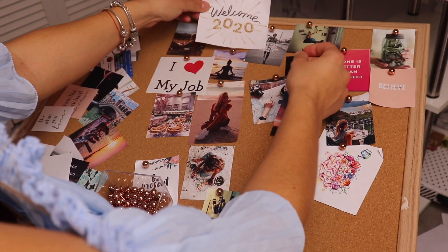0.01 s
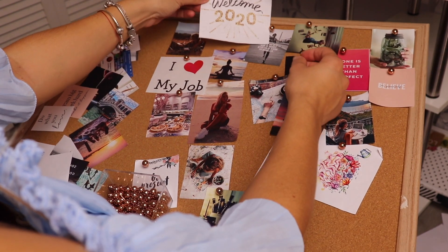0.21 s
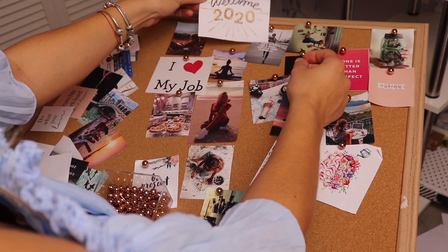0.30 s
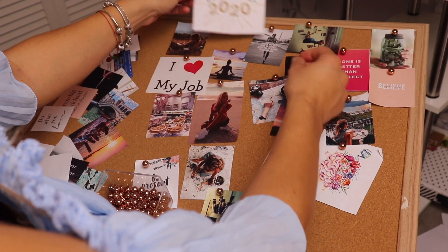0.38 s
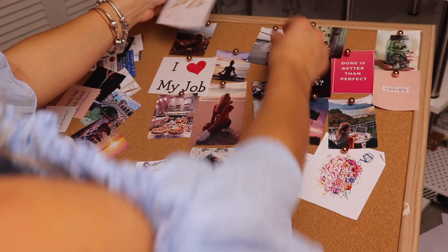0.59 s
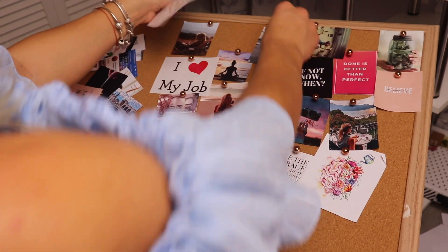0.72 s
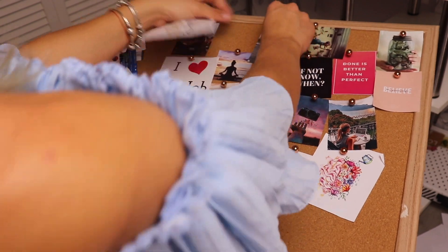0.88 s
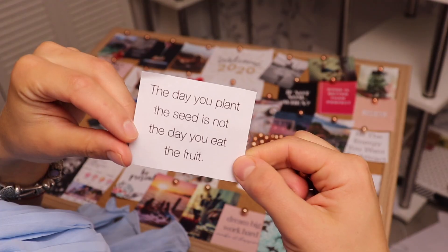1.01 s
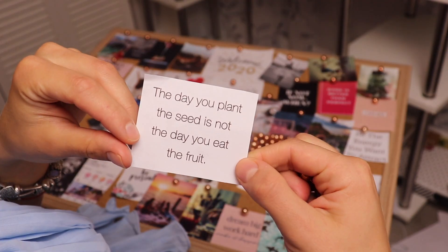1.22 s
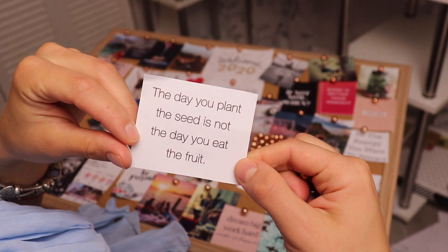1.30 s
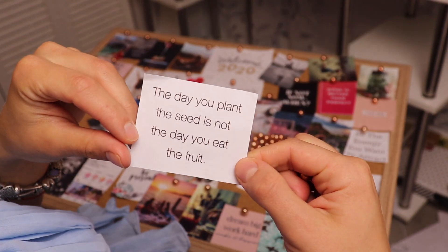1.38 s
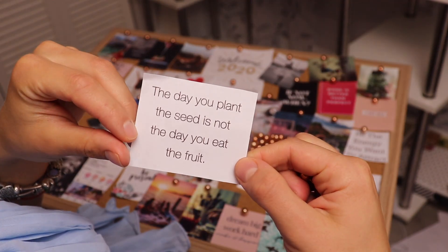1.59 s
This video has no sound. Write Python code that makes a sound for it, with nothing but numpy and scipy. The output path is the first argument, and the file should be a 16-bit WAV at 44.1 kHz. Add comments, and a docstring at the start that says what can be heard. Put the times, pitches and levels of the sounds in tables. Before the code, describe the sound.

Close up in a quiet small room, stiff paper brushes cork in uneven strokes, a pin snaps brightly, a softer click follows, then a crunchy knock and two soft taps before only low room air remains.

```python
"""Cards slide and rustle on a cork board in a small quiet room, made from dense random grains in four tone colours.
A pin snaps sharply and a lighter click follows: very short pushes set fading sine tones (modes) ringing.
A dull knock rattles and crunches on the board, then soft fingertips tap it; these are ringing modes too.
A faint sine hum wavers for the first second under a steady room tone of shaped noise.
The slides, snaps, knock and taps also sound through a room tail of fading noise."""
import sys
import numpy as np
from scipy import signal
from scipy.fft import rfft, irfft
from scipy.io import wavfile
from scipy.ndimage import uniform_filter1d

SR = 44100
rng = np.random.default_rng(int(sys.argv[2]) if len(sys.argv) > 2 else 0)


def volts_from_decibels(level):
    """Turn decibel levels (scalar or array-like) into linear amplitude factors."""
    exponent = np.asarray(level, float) / 20
    return 10 ** exponent


def output_pcm(signal):
    """Save a mono or channel-first signal as 16-bit PCM at the path in sys.argv[1].

    Samples are clipped to [-1, 1] before scaling.
    """
    pcm = np.clip(np.atleast_2d(signal).T, -1, 1) * 32767
    wavfile.write(sys.argv[1], SR, np.round(pcm).astype(np.int16))


N = 72765  # samples, 1.65 s


def across(table, size):
    """Reads a (frequency, value) table at every frequency of a transform, on a logarithmic scale."""
    hz, value = np.array(table, float).T
    bin_hz = np.maximum(np.fft.rfftfreq(size, 1 / SR), 1)
    return np.interp(np.log(bin_hz), np.log(hz), value)


def colour(x, table):
    """Gives a sound the tone colour in a (frequency, level) table and scales it to an rms of 1."""
    size = x.shape[-1]
    y = irfft(rfft(x) * volts_from_decibels(across(table, size)), size)
    return y / np.sqrt(np.mean(y ** 2))


def stereo_noise(size, like):
    """Noise whose left and right are as alike as a table says: 0 is unrelated, 1 is the same."""
    c = np.clip(across(like, size), 0, 1)
    mid, side = rfft(rng.standard_normal((2, size)))
    mid, side = np.sqrt(1 + c) * mid, np.sqrt(1 - c) * side
    return irfft(np.array([mid + side, mid - side]), size) / np.sqrt(2)


def walk(rate):
    """A random up-and-down curve with about `rate` new values per second, smoothed; its spread is near 1."""
    k = int(SR / rate)
    steps = np.repeat(rng.standard_normal(N // k + 1), k)
    return 1.3 * uniform_filter1d(uniform_filter1d(steps, k), k)[:N]


def room(dry):
    """Echoes merge into a diffuse tail: half-octave bands of noise, each dying at its own rate."""
    # time to fade by 60 dB: (frequency [Hz], time [s])
    fade_times = [(200, 0.57), (500, 0.3), (1400, 0.25), (3700, 0.32), (9000, 0.2), (15000, 0.0667)]
    # tone colour of the tail: (frequency [Hz], level [dB])
    tail_colour = [(200, 2), (500, -1.5), (1400, 2.5), (3700, -3), (7500, 1.5), (15000, 0.5)]
    # likeness of left and right: (frequency [Hz], likeness [0-1])
    tail_like = [(200, 0.54), (600, 0.88), (1500, 0.17), (4000, 0.12)]
    size, onset_s = 16384, .003
    t = np.arange(size) / SR
    bin_hz = np.maximum(np.fft.rfftfreq(size, 1 / SR), 1)
    noise = rfft(stereo_noise(size, tail_like)) * volts_from_decibels(across(tail_colour, size))
    fade_hz, fade_s = np.array(fade_times).T
    tail = 0
    for centre_hz in 2 ** np.arange(6, 14.6, .5):
        band = np.clip(1 - 2 * np.abs(np.log2(bin_hz / centre_hz)), 0, 1)
        t60 = np.interp(np.log(centre_hz), np.log(fade_hz), fade_s)
        tail = tail + irfft(noise * band, size) * volts_from_decibels(-60 * t / t60)
    tail = tail * (1 - np.exp(-t / onset_s))
    tail = tail / np.sqrt(np.mean(np.sum(tail ** 2, axis=1)))
    return signal.fftconvolve(dry[None], tail, axes=1)[:, :N]


def pushes(times, dbs, widths):
    """Smooth bell-shaped pushes whose area follows their strength; a wider push sounds duller."""
    t = np.arange(N) / SR
    return sum(volts_from_decibels(db) * np.exp(-2 * ((t - s) / w) ** 2) / (w * SR) for s, db, w in zip(times, dbs, widths))


def ring(modes, sense):
    """Sum of fading sines, each multiplied by one more factor of `sense`; a negative one flips every second mode."""
    t = np.arange(4096) / SR
    total = 0
    for k, (hz, db, t60) in enumerate(modes):
        total = total + sense ** k * volts_from_decibels(db - 60 * t / t60) * np.sin(2 * np.pi * hz * t)
    return total


def struck(force, modes, low_hz=345, sense=1):
    """A force rings the modes; small objects radiate little below low_hz, so the bass is cut."""
    ringing = signal.fftconvolve(force, ring(modes, sense))[:N]
    bass_cut = signal.butter(3, low_hz, "high", fs=SR, output="sos")
    return signal.sosfilt(bass_cut, ringing)


def slide():
    """Many fibre grains of uneven size make paper hiss, the board's body, thin-edge sizzle and a low rub."""
    # sliding cards: (time [s], hiss level [dB], then relative to the hiss: board body [dB],
    # thin-edge sizzle [dB], low rub [dB])
    strokes = [(0, -58, -1, -1, -4.5), (.05, -74, 10.5, 3, -14), (.1, -61, -3.5, 6, -14),
               (0.136, -61, 7, -3, -16), (0.136, -44, 0, 7.5, -5), (0.143, -51, 0.5, -22, 7),
               (0.162, -47, 9, -15, 6.5), (0.182, -57.5, 8, -16, -23), (0.212, -77.5, 13, -18.5, 21),
               (.235, -42, -6, -16, -15), (.29, -45.5, -3.5, -24, -8), (.34, -60.5, 3, -7, 0),
               (0.366, -49.5, 4, 8.5, -30), (0.388, -45.5, 0, 3.5, -55), (.405, -53.5, 18.5, -17, 11),
               (.42, -62, 4, -25, -41), (.48, -59, 5, 0, -20), (.495, -46, -10, 4, -18),
               (.51, -41, -6, 3, -28), (0.538, -47, -4, 0, -32), (.56, -48, -19, -9, -32),
               (.615, -53.5, -2, 6, 1), (.635, -45.5, -19, -19, -44), (0.671, -41, -15, -5, -3.5),
               (.7, -39, -10, -1, -11.5), (0.736, -41.5, -10, -3, -2.5), (.757, -46, -15, -15, -10),
               (0.798, -55.5, 7, -16, 7), (0.849, -63, 10, -16, 2.5), (0.932, -77.5, 10, -10, 18),
               (0.972, -59.5, 4.5, -28, 7.5), (0.999, -74, 5, -11.5, 12), (1.03, -84, -8.5, -26, -10)]
    # tone colour of the paper hiss: (frequency [Hz], level [dB])
    paper_hiss = [(1500, -34), (2600, -13), (3400, 0), (5000, 3), (7400, 4), (9500, 2), (12000, -9),
                  (16000, -10)]
    # tone colour of the board's body: (frequency [Hz], level [dB])
    board_body = [(400, -14), (900, -5.5), (1400, -2.5), (2000, 0), (3000, -3), (4200, -9), (6000, -15.5)]
    # tone colour of the thin edges: (frequency [Hz], level [dB])
    edge_sizzle = [(5500, -44), (8500, -8.5), (11000, -5), (13500, -4), (15500, 0.5)]
    # tone colour of the low rub: (frequency [Hz], level [dB])
    low_rub = [(60, -15), (120, 9), (300, 6.5), (800, 8), (1300, 6), (2500, -5.5)]
    grains_per_s, grain_spread_db, flutter_db = 9000, 1.6, 1.6
    lag_s, pan_db, wet_db = 1 / SR, -.6, -8
    t = np.arange(N) / SR
    s, hiss_db, *relative_db = np.array(strokes).T
    near = 0
    for table, rel_db in zip((paper_hiss, board_body, edge_sizzle, low_rub), [0 * s] + relative_db):
        grains = (rng.random(N) < grains_per_s / SR) * rng.standard_normal(N)
        grains = grains * volts_from_decibels(grain_spread_db * rng.exponential(size=N))
        level_db = np.interp(t, s, hiss_db + rel_db) + flutter_db * walk(120.7)
        near = near + colour(grains, table) * volts_from_decibels(level_db)
    # the left side is slightly later and quieter
    left = np.interp(t - lag_s, t, near) * volts_from_decibels(pan_db / 2)
    right = near * volts_from_decibels(-pan_db / 2)
    return np.array([left, right]) + volts_from_decibels(wet_db) * room(near)


def snaps():
    """Very short contacts ring the pin and card; each mode has its own level on the left and right."""
    # pin snap and lighter click: (time [s], push strength [dB], push half-width [s], room send [dB])
    contacts = [(0.22, -4, 0.000021, -5.5), (0.3981, -21, 0.00011, -4), (0.3998, -25, 0.000084, -5.5)]
    # pin and card modes: (frequency [Hz], left level [dB], right level [dB], time to fade by 60 dB [s])
    pin_modes = [(440, -6, -6.5, 0.038), (1327, -27, -47, 0.0021), (2050, -2.5, -21, 0.0045),
                 (2423, -12, -1, 0.007), (3500, 2.5, 0.5, 0.0019), (5200, -11, -23, 0.0012),
                 (6730, -3, 1.5, 0.0018), (7580, -9, -1, 0.0024), (9500, -11, -34, .002),
                 (10720, -26, -5, 0.0035), (12800, -16, -13.5, 0.0042), (15400, -36, -28, .002)]
    low_hz = 920  # the pin is very small and radiates even less bass
    s, db, w, send_db = np.array(contacts).T
    modes = np.array(pin_modes)
    left_modes, right_modes = modes[:, [0, 1, 3]], modes[:, [0, 2, 3]]
    force = pushes(s, db, w)
    near = np.array([struck(force, left_modes, low_hz), struck(force, right_modes, low_hz)])
    to_room = struck(pushes(s, db + send_db, w), left_modes, low_hz)
    return near + room(to_room)


def knock():
    """A rattling run of contacts and a noisy crunch of crushed cork ring the board's modes."""
    # contacts of the knock: (time [s], push strength [dB], push half-width [s])
    contacts = [(0.7585, -33, 0.00028), (0.7621, -25, 0.00003), (0.7637, -23, 0.00018),
                (0.7664, -23.5, .0002), (0.7683, -20, 0.00019), (0.7765, -17, 0.00045),
                (0.776, -34, 0.00011), (0.7859, -49, 0.00016)]
    # board modes: (frequency [Hz], level [dB], time to fade by 60 dB [s])
    board_modes = [(463, -8.5, 0.01), (778, -3.5, 0.012), (993, -3.5, 0.022), (1130, 1, 0.0099),
                   (1576, 3.5, 0.0055), (1884, -6, 0.015), (2220, -4.5, 0.006), (2930, -6, 0.0099),
                   (3620, -3.5, 0.0048), (4780, -14.5, 0.012)]
    crunch_s, crunch_db, rise_s, fall_s = .756, -38, .005, .011
    t = np.maximum(np.arange(N) / SR - crunch_s, 0)  # time since the crunch began
    swell = (1 - np.exp(-(t / rise_s) ** 2)) * np.exp(-t / fall_s)
    crunch = volts_from_decibels(crunch_db) * swell * rng.standard_normal(N)
    return struck(pushes(*np.array(contacts).T) + crunch, board_modes, sense=-1.03)


def taps():
    """Soft fingertips press for longer than hard objects, so each tap rings just one low mode."""
    # finger taps: (time [s], push strength [dB], frequency [Hz], time to fade by 60 dB [s])
    fingers = [(0.9028, -35.5, 346, 0.023), (0.967, -40, 180, 0.01)]
    return sum(struck(pushes([s], [db], [.0004]), [(hz, 0, t60)], low_hz=90) for s, db, hz, t60 in fingers)


def on_board():
    """The knock and the taps are equally loud left and right, with the room tail around them."""
    near = knock() + taps()
    return near + volts_from_decibels(-6.5) * room(near)


def hum():
    """A faint low sine that wavers in pitch and level and stops."""
    # level of the hum: (time [s], level [dB])
    hum_level = [(0, -80), (.09, -64), (.3, -64), (.56, -64.5), (.72, -56.5), (.83, -72), (.9, -55),
                 (1, -77)]
    centre_hz, waver_db = 146.5, 2
    t = np.arange(N) / SR
    s, db = np.array(hum_level).T
    hz = centre_hz * (1 + 0.0049 * walk(8.5))
    phase = 2 * np.pi * np.cumsum(hz) / SR
    level_db = np.interp(t, s, db, right=-120) + waver_db * walk(15.4)
    return np.sqrt(2) * volts_from_decibels(level_db) * np.sin(phase)


def room_tone():
    """Smooth hiss and low air noise; left and right are alike mostly in the bass."""
    # tone colour: (frequency [Hz], level [dB])
    air_colour = [(12, -21), (20, -25), (49, -3), (210, -1), (248, -4.5), (410, -5.5), (542, -7.5),
                  (607, -11.5), (660, -10), (1440, -12.5), (2820, -16), (7520, -22.5), (16000, -34.5)]
    # likeness of left and right: (frequency [Hz], likeness [0-1])
    air_like = [(30, .6), (120, .55), (300, .5), (700, .15), (1500, 0)]
    balance_db = np.array([[-.5], [.5]])  # left, right
    return volts_from_decibels(-53) * colour(stereo_noise(N, air_like), air_colour) * volts_from_decibels(balance_db)


def scene():
    """Adds up all sources."""
    return slide() + snaps() + on_board() + hum() + room_tone()


def band_limit(x):
    """A steep low-pass at the top of the band."""
    return signal.sosfilt(signal.butter(12, 16990, fs=SR, output="sos"), x)


def record(dry):
    """The recorder rounds off the loudest peaks towards a ceiling and cuts the very top of the treble."""
    ceiling, top_hz = .92, 15900
    rounded = ceiling * np.tanh(dry / ceiling)
    treble_cut = signal.ellip(8, .2, 70, top_hz, fs=SR, output="sos")
    mix = signal.sosfilt(treble_cut, rounded)
    return band_limit(mix)


dry = scene()
out = record(dry)
output_pcm(out)
```